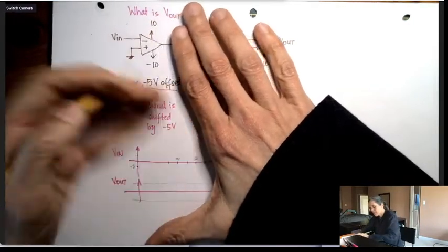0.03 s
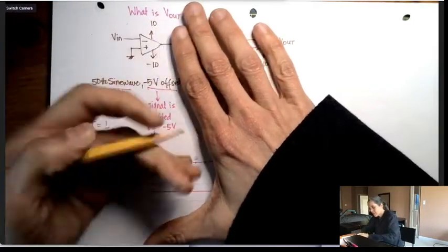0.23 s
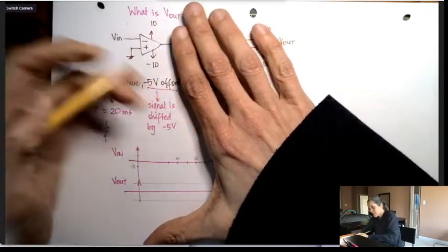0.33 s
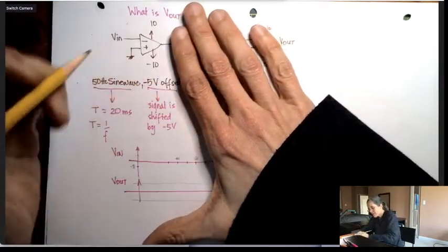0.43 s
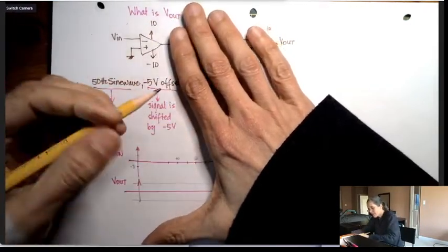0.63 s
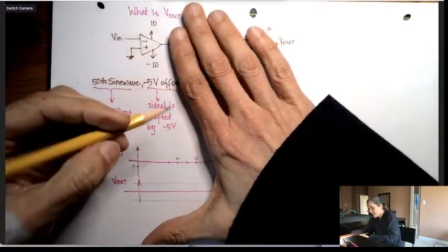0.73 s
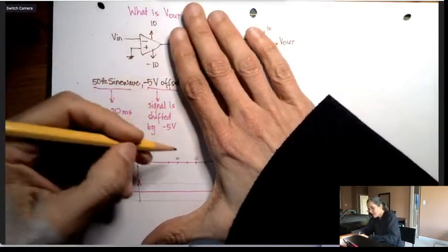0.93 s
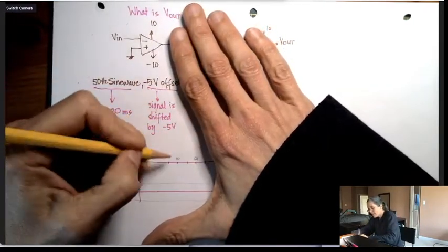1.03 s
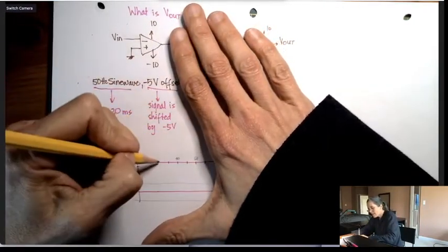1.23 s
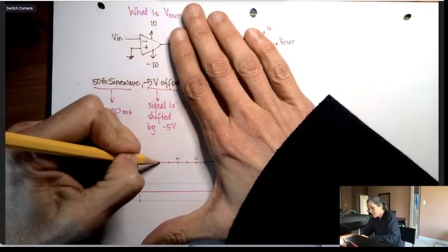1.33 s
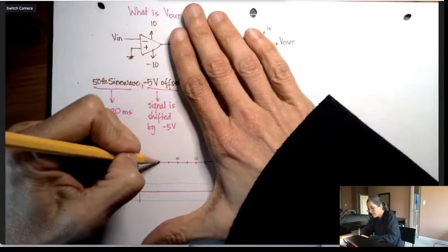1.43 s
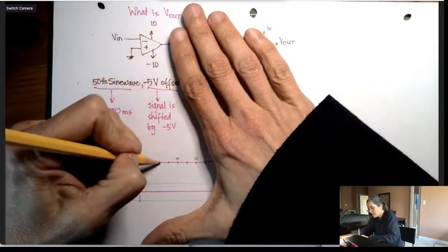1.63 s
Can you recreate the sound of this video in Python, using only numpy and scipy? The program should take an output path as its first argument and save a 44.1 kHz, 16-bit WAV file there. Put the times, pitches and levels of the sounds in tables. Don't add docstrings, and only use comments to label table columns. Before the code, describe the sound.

A hand brushes crumbs off paper on a wooden desk: a soft knock at 0 seconds and a short airy swish peaking near 0.1, then a stronger knock at 0.29 and a second swish until 0.4. Deep desk wobble follows around 0.45. Low fan hum and faint hiss continue; a pencil tip ticks at 1.34, with soft thuds and slight paper rustle to about 1.7. Close microphone, small room.

```python
import sys
import numpy as np
from scipy import signal
from scipy.fft import rfft, irfft, next_fast_len
from scipy.io import wavfile
from scipy.ndimage import uniform_filter1d

SR = 44100
rng = np.random.default_rng(int(sys.argv[2]) if len(sys.argv) > 2 else 0)


def transcribe(signal):
    frames = np.atleast_2d(signal).T
    limited = np.clip(frames, -1, 1)
    pcm = np.round(limited * 32767).astype(np.int16)
    wavfile.write(sys.argv[1], SR, pcm)


def convert_level_to_amplitude(level_db):
    exponent = np.asarray(level_db, float) / 20
    return 10 ** exponent


N = 74970
TIME_S = np.arange(N) / SR


def rms_one(x):
    return x / np.sqrt(np.mean(x ** 2) + 1e-20)


def in_time(rows):
    s, *columns = np.transpose(rows)
    return [np.interp(TIME_S, s, column) for column in columns]


def coloured(x, points):
    hz, db = np.transpose(points)
    f = np.arange(N // 2 + 1) * SR / N + 0.0013
    gain = convert_level_to_amplitude(np.interp(np.log(f), np.log(hz), db, -120, db[-1]))
    return rms_one(irfft(rfft(x) * gain, N))


def drift(rate_hz):
    r = np.exp(-2 * np.pi * rate_hz / SR)
    noise = rng.standard_normal(N + SR)
    return rms_one(signal.lfilter([1], [1, -2 * r, r * r], noise)[SR:])


def ring(x, hz, t60):
    r, w = convert_level_to_amplitude(-60 / (t60 * SR)), 2 * np.pi * hz / SR
    return signal.lfilter([0, np.sin(w)], [1, -2 * r * np.cos(w), r * r], x + 1e-18)


def resonance(hz, width_hz):
    t60, run_in = np.log(1000) / np.pi / width_hz, SR // 4
    rung = ring(rng.standard_normal(N + run_in), hz, t60)
    z = signal.hilbert(rung, next_fast_len(N + run_in))
    even = z.real / np.abs(z) ** 0.9
    start = run_in - 999
    return rms_one(ring(even, hz, t60 / 2)[start:start + N])


def bump(s, length_s):
    return np.exp(-0.5 * ((TIME_S - s) / length_s) ** 2)


def rubbed_modes(rows, width):
    return sum(convert_level_to_amplitude(db) * bump(s, length) * resonance(hz, hz * width) for s, hz, db, length in rows)


def grains():
    size = convert_level_to_amplitude(1.2 * rng.exponential(1, N)) * rng.standard_normal(N)
    return size * (rng.random(N) < 20000 / SR)


# f/Hz, width/Hz, level at mid time/dB, trend/(dB/s)
HUM = [
    (118.1, 17, -70.5, -0.1),
    (218.2, 19, -70.5, 7.5),
    (328.3, 28.3, -75, 1),
    (989.6, 14, -83.5, -7.5),
    (1364.5, 13, -88.5, 2),
    (1930, 440, -87, -3.5),
]


def fan_hum():
    t = TIME_S - N / SR / 2
    return sum(convert_level_to_amplitude(db + trend_db * t + 1.2 * drift(2.9)) * resonance(hz, width)
               for hz, width, db, trend_db in HUM)


# f/Hz, density/dB
RUMBLE = [(18, -12.5), (30, 1), (70, -10.5), (124, -12.5), (146, -11.5), (231, -6), (279, -14.5),
          (337, -17.5), (600, -26.5), (780, -55), (1320, -120)]


def fan_rumble():
    return convert_level_to_amplitude(-62 + 1.2 * drift(7.6)) * coloured(rng.standard_normal(N), RUMBLE)


# f/Hz, density/dB
AIR = [(350, -23), (600, -8.5), (880, -3), (942, -3.5), (1220, 1), (1440, -6.5), (2200, -16),
       (12600, -25.5), (15700, -23.5)]


def fan_air():
    level_db = -72 - 2.5 * (TIME_S - N / SR / 2) + 0.22 * drift(9)
    return convert_level_to_amplitude(level_db) * coloured(rng.standard_normal(N), AIR)


# t/s, f/Hz, level/dB
BLADE = [(0, 241, -73), (.1, 241.4, -62.5), (.22, 235, -70.5), (.4, 246.7, -67.5), (.6, 248.4, -65.5),
         (.75, 238.4, -74.5), (.95, 230, -64.5), (1.17, 225.2, -62), (1.3, 234.7, -68.5),
         (1.5, 231.5, -60.5), (1.7, 236.8, -69.5)]


def fan_blade():
    hz, db = in_time(BLADE)
    level = np.sqrt(2) * convert_level_to_amplitude(db + 1.9 * drift(4.6))
    waver_hz = 6.7 * drift(20.6)
    return level * np.sin(2 * np.pi * np.cumsum(hz + waver_hz) / SR)


# t/s, level/dB, f/Hz
SWAY = [(0, -45.5, 25), (.066, -73, 16.1), (.122, -42.5, 20.07), (.29, -41.5, 20.3), (.354, -54.5, 17),
        (.4, -32, 14.1), (.45, -23.5, 19.4), (.535, -30, 19.9), (.586, -40.5, 20.3), (.686, -38, 22),
        (.72, -52.5, 29.5), (.8, -34.5, 22.6), (.876, -42.5, 20.37), (1.03, -39, 14.8), (1.09, -55, 19.5),
        (1.17, -42, 21), (1.3, -54, 21.5), (1.7, -51, 22.4)]


def desk_sway():
    db, hz = uniform_filter1d(in_time(SWAY), size=int(0.04 * SR), axis=1)
    rocking = np.sqrt(2) * convert_level_to_amplitude(db) * np.sin(2 * np.pi * np.cumsum(hz) / SR + 1.16)
    slow_db = -45.5 + 0.35 * (db - db.mean())
    return rocking + convert_level_to_amplitude(slow_db) * resonance(8.3, 4.6)


def board_release():
    return -convert_level_to_amplitude(-40.5) * np.exp(-TIME_S / 0.005)


# t/s, level/dB, damping stretch/1
KNOCKS = [
    (.0005, -45.5, 0.99),
    (.07, -58.5, 0.97),
    (.291, -37, 0.95),
    (.346, -58, 0.57),
    (0.363, -58.5, 0.65),
    (0.402, -61, .5),
]
# f/Hz, level/dB, time of peak/s
DESK = [(55, 0, 0.018), (114.5, -11, 0.06), (154, 2.5, 0.0088), (230, -10.5, 0.016), (269, -5, 0.0086),
        (329.8, 1, 0.022), (411.4, -9.5, 0.018), (467.5, -7, 0.0093), (570, -26, 0.015),
        (800, -14.5, 0.0043), (976, -32, 0.0042)]
SENSE = [-1, -1, 1, -1, 1, -1, -1, 1, 1, -1, 1]


def desk():
    swell_sharpness, mode_spread_db = 3.54, -1
    out = np.zeros(N)
    for s, db, stretch in KNOCKS:
        t = np.maximum(TIME_S - s, 0)
        for (hz, mode_db, peak), sense in zip(DESK, SENSE):
            x = t / (peak * stretch)
            swell = (x * np.exp(1 - x)) ** swell_sharpness
            level = convert_level_to_amplitude(db + mode_db + mode_spread_db * rng.standard_normal())
            out += sense * level * swell * np.sin(2 * np.pi * hz * t)
    return out


# t/s, f/Hz, level/dB, length/s
NOTES = [(.008, 798, -70, 0.0031), (.028, 1130, -73, 0.013), (.034, 820, -67, 0.0042),
         (.055, 2040, -69.5, 0.0032), (.073, 2130, -71, 0.0032), (.075, 842, -64.5, 0.0068),
         (.074, 1470, -68, 0.0047), (.107, 1210, -62, 0.0015), (.108, 1420, -66, .005),
         (.326, 773, -66.5, 0.0082), (.598, 1146, -70.5, .007), (.59, 1850, -78, 0.0062),
         (1.346, 1873, -70.5, .004), (1.3545, 1147, -60.5, 0.0053), (1.36, 1873, -72, .01),
         (1.378, 1147, -71, 0.0051), (1.4244, 1180, -70, 0.0029), (1.626, 978.5, -72, 0.0033),
         (1.637, 1480, -68, .003), (1.632, 2024, -83, 0.0086), (1.641, 800, -77, 0.0089),
         (1.656, 840, -66, 0.0074), (1.657, 2010, -70.5, .004), (1.674, 1210, -68.5, .008),
         (1.678, 896, -66, 0.005), (1.675, 1550, -74, 0.0048)]


def sheet_notes():
    return rubbed_modes(NOTES, 0.055)


# f/Hz, density/dB
SWISH = [(1530, -80), (2600, -6), (4320, -3), (4830, -5), (5700, -3), (6180, -4), (7510, -0.5), (15500, 1)]


def swish():
    return coloured(grains(), SWISH)


# (6.5 dB up above 8 kHz and down below, held within 2)
SWEEP_A = [
    (.01, -85, -4),
    (.03, -73, 0),
    (.056, -66, -0.5),
    (.078, -69.5, -0.5),
    (.102, -63, 0.74),
    (.122, -76, -1),
    (.139, -86, -10.5),
    (.16, -100.5, 7),
    (.19, -100, -.8),
]
# (6.5 dB up above 8 kHz and down below, held within 2)
SWEEP_B = [
    (.3, -84, 0.37),
    (.313, -72, -0.38),
    (.33, -64.5, 0.31),
    (.356, -60.5, 0.28),
    (.382, -63, 1.06),
    (.398, -72.5, -0.84),
    (.415, -85, -1.1),
    (.466, -99, -0.52),
    (.54, -104, 0.1),
]


def hand_sweeps():
    out = np.zeros(N)
    for rows in (SWEEP_A, SWEEP_B):
        db, tilt = in_time(rows)
        lean_db = 6.5 * np.clip(tilt, -2, 2)
        low = signal.sosfilt(signal.butter(2, 8000, fs=SR, output="sos"), swish())
        high = signal.sosfilt(signal.butter(2, 8000, "high", fs=SR, output="sos"), swish())
        touch_down = np.clip((TIME_S - rows[0][0]) / 0.01, 0, 1)
        lift_off = np.clip((rows[-1][0] - TIME_S) / 0.03, 0, 1)
        level = convert_level_to_amplitude(db + 1.0 * drift(80))
        out += touch_down * lift_off * level * (low * convert_level_to_amplitude(-lean_db) + high * convert_level_to_amplitude(lean_db))
    return out


# t/s, f/Hz, level/dB, length/s
SQUEAKS = [(0.043, 4020, -69.5, 0.0048), (0.0945, 12700, -67, 0.01), (0.106, 14600, -71, 0.01),
           (.2935, 3970, -74, 0.0012), (0.332, 4388, -72.5, 0.0065), (.35, 5740, -72, 0.017),
           (0.35, 7480, -67.5, 0.02), (.353, 10600, -70.5, 0.023), (0.381, 12500, -74, 0.005),
           (0.986, 4100, -89, 0.014), (1.342, 5370, -71, .002), (1.3415, 7700, -74, 0.0022),
           (1.3415, 9500, -77.5, 0.0019), (1.346, 6344, -77, .003), (1.357, 5900, -74, .005),
           (1.359, 9400, -76, 0.0044), (1.384, 6200, -84, .003), (1.662, 4330, -84, 0.0052),
           (1.666, 3826, -84, 0.0045)]


def paper_squeaks():
    return rubbed_modes(SQUEAKS, 0.09)


# t/s, f/Hz, level/dB, length/s
RUSTLES = [(0.056, 1660, -76, .03), (0.177, 1020, -79.5, 0.017), (0.27, 1200, -64.5, 0.0018),
           (0.27, 560, -78, .004), (0.36, 1900, -74.5, 0.025), (0.36, 620, -68.5, 0.051),
           (0.29, 1300, -65.5, 0.01), (1.344, 1640, -74, 0.0049), (1.35, 2090, -74.5, 0.0095),
           (1.7, 1580, -76, .01), (1.365, 3160, -81, 0.012), (.14, 2100, -76.5, 0.018),
           (1.64, 2000, -77, 0.017), (1.39, 1380, -72.5, 0.025), (1.8, 1330, -72, 0.037)]


def rustles():
    return signal.sosfilt(signal.butter(2, 550, "high", fs=SR, output="sos"), rubbed_modes(RUSTLES, 0.2))


# t/s, ring level/dB, crack level/dB, crack t60/s
TICKS = [
    (.2924, -76, -67, 0.022),
    (1.3402, -62, -63, 0.047),
    (1.352, -86, -78, 0.12),
    (1.381, -73.5, -79, 0.067),
]
# f/Hz, level/dB, t60/s
PENCIL = [
    (1147, -1, 0.15),
    (1873, -2, 0.095),
    (2228, -8, 0.061),
    (1550, -13, 0.04),
    (3240, -14, 0.071),
    (5990, -10, .05),
]
# f/Hz, density/dB
CRACK = [(1350, -34), (2300, 2.5), (3290, 0), (4300, -3.5), (5300, -4), (6500, -2), (7700, -2), (9200, -6),
         (15500, -6.5)]


def pencil():
    out, noise = np.zeros(N), coloured(grains(), CRACK)
    for s, ring_db, crack_db, crack_t60 in TICKS:
        click = convert_level_to_amplitude(ring_db) * (np.arange(N) == int(s * SR))
        for hz, db, t60 in PENCIL:
            out += convert_level_to_amplitude(db + 0.76 * rng.standard_normal()) * ring(click, hz, t60)
        since = np.maximum(TIME_S - s, 0)
        out += noise * (TIME_S > s) * convert_level_to_amplitude(crack_db - 60 * since / crack_t60)
    return out


# t/s, f/Hz, level/dB, length/s
THUDS = [
    (0.84, 50, -55, 0.033),
    (1.2, 64, -60, 0.051),
    (1.6, 44, -52.5, .025),
    (1.35, 118, -63.5, 0.03),
    (1.48, 122, -58.5, .025),
    (.65, 120, -66, 0.03),
    (1.4, 230, -55.5, 0.0088),
]


def wrist_thuds():
    return sum(convert_level_to_amplitude(db) * bump(s, length) * np.cos(2 * np.pi * hz * (TIME_S - s))
               for s, hz, db, length in THUDS)


# t/s, length/s, level/dB
SLIDES = [
    (0.977, 0.033, -82),
    (1.38, 0.16, -87),
    (1.665, 0.07, -83.5),
]


def wrist_slides():
    return sum(convert_level_to_amplitude(db) * bump(s, length) for s, length, db in SLIDES) * swish()


def room(x):
    t = np.arange(SR // 2) / SR
    tail = rng.standard_normal(len(t)) * convert_level_to_amplitude(-60 * t / 0.28) * (t > 0.004)
    return convert_level_to_amplitude(-8) * signal.fftconvolve(x, tail / np.sqrt(np.sum(tail ** 2)))[:N]


def scene():
    near = pencil() + hand_sweeps()
    near += paper_squeaks() + sheet_notes() + rustles() + wrist_slides()
    board = desk()
    echo = room(near + convert_level_to_amplitude(-11.5) * board)
    shaken = desk_sway() + board_release() + wrist_thuds()
    fan = fan_hum() + fan_rumble() + fan_air() + fan_blade()
    return (board + near + echo + shaken + fan)[None]


def low_pass(x):
    return signal.sosfilt(signal.butter(12, 15780, fs=SR, output="sos"), x)


def record(dry):
    mix = signal.sosfilt(signal.cheby2(12, 70, 16900, fs=SR, output="sos"), dry)
    return low_pass(mix)


dry = scene()
out = record(dry)
transcribe(out)
```